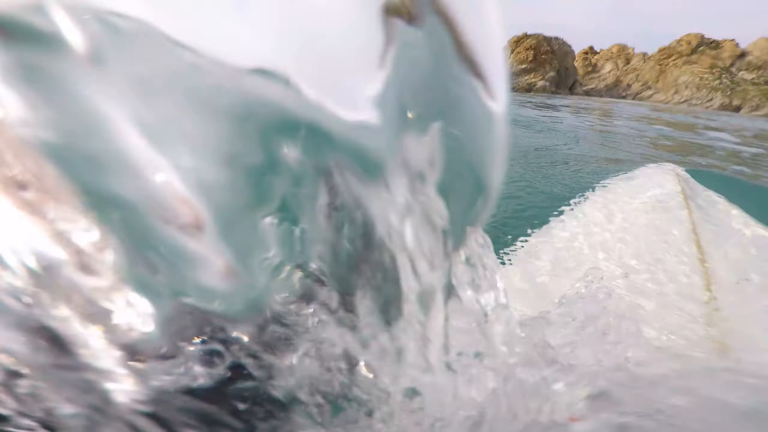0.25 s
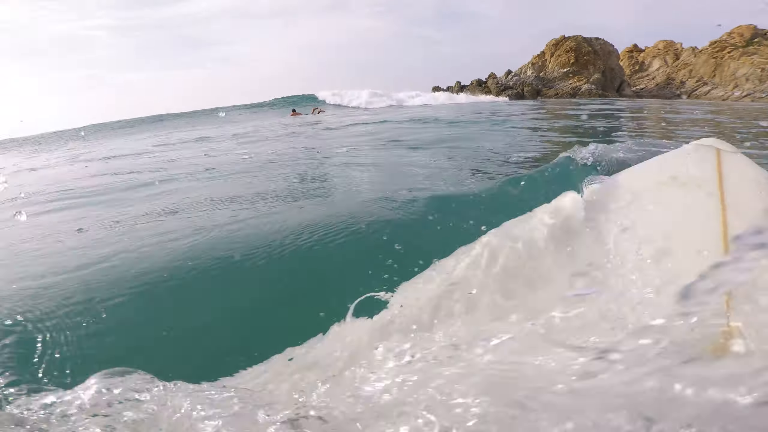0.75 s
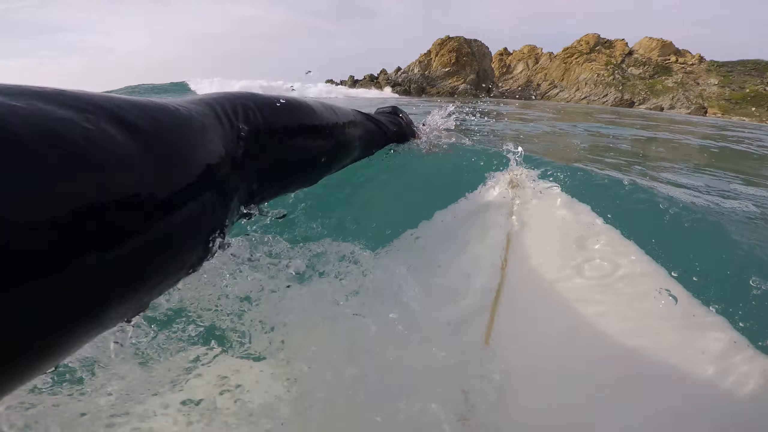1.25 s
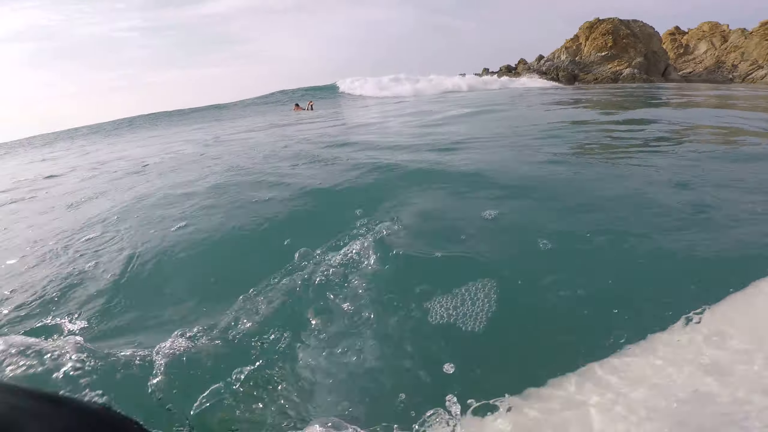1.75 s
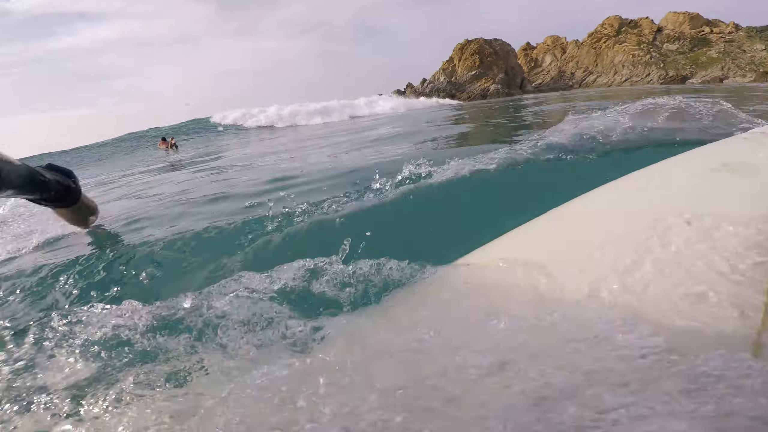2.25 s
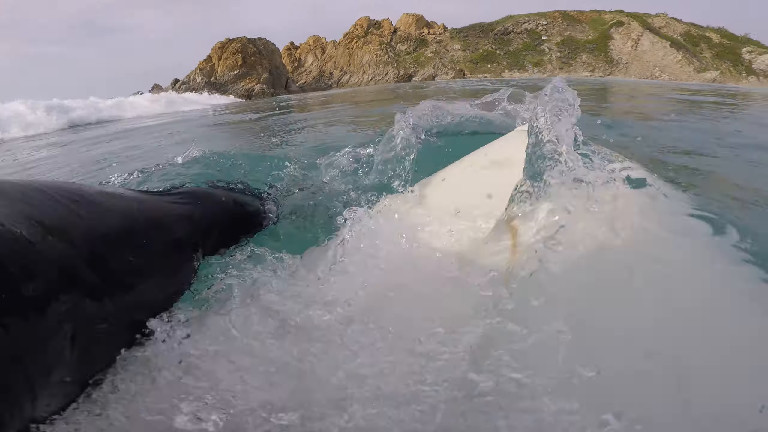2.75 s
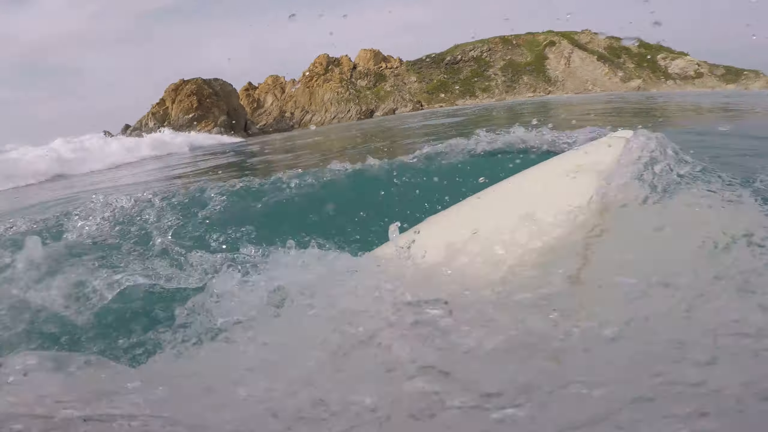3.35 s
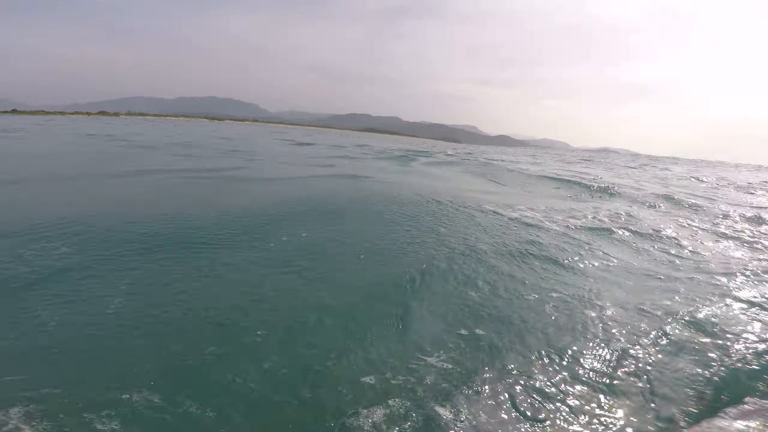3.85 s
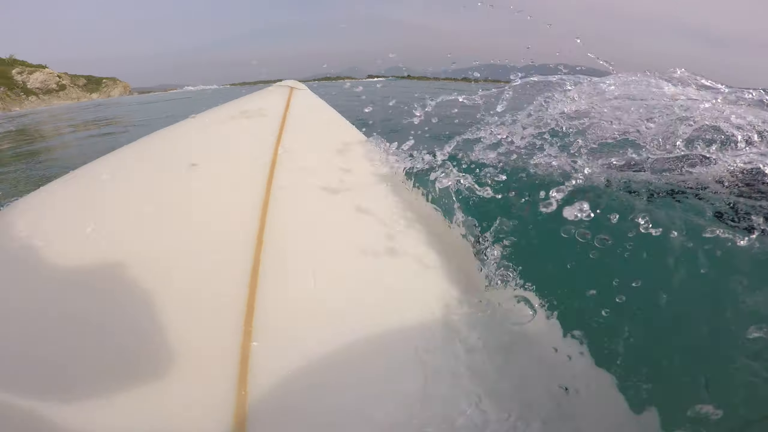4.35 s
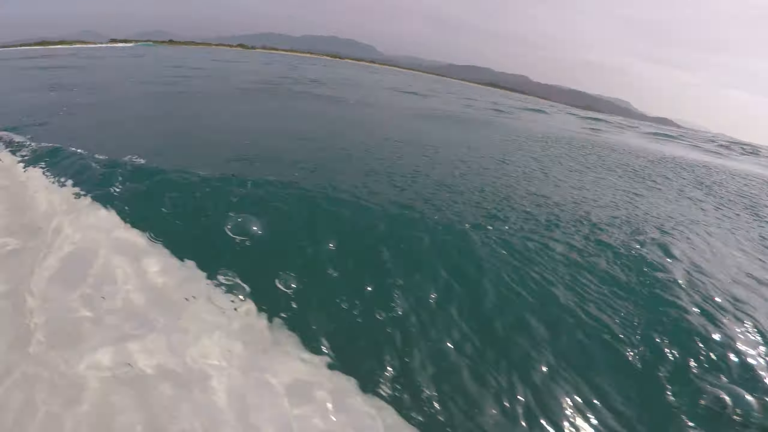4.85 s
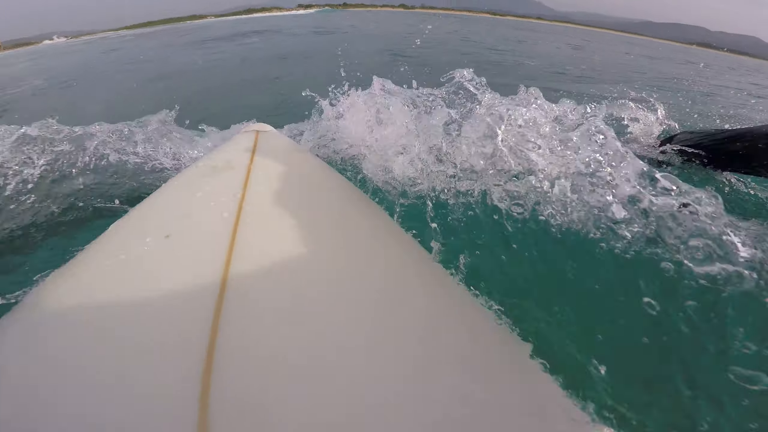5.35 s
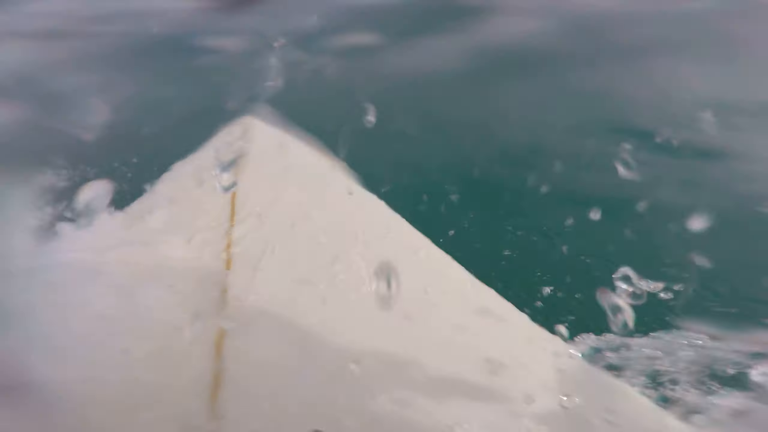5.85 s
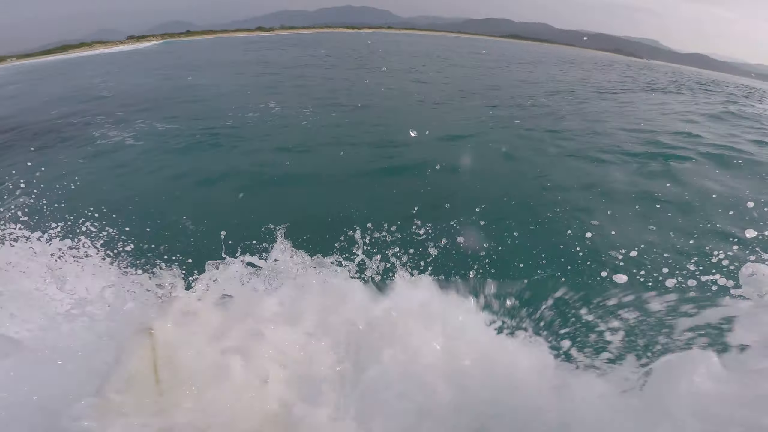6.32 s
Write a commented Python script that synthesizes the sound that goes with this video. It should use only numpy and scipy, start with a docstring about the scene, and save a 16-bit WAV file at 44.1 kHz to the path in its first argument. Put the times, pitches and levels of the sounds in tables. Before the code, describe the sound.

Water gurgles, sloshes and splashes close around a surfboard moving through small waves, with low thuds and wind rumble on the microphone.

```python
"""Foam gurgles past a surfboard running through small waves, heard from a wet waterproof housing.
Each bubble rings as a mass of water on a spring of air: the smaller the bubble, the higher its pitch.
Drops tick on the microphone port, air pockets ring, and puffs and hollows shape noise by resonance.
A water film in the port cuts the treble; spray leaks through above a notch that climbs as it drains.
Underneath, the turbulent pressure of water and wind buffets the housing."""
import sys
import numpy as np
from scipy import signal
from scipy.fft import rfft, irfft, next_fast_len
from scipy.io import wavfile
from scipy.ndimage import uniform_filter1d, minimum_filter1d

SR = 44100
rng = np.random.default_rng(int(sys.argv[2]) if len(sys.argv) > 2 else 0)


def digitize_waveform(pressure):
    """Quantize a signal to 16-bit integers and store it at the path in sys.argv[1].

    Rows of a 2-D input are taken as channels; values are limited to [-1, 1].
    """
    field = np.atleast_2d(pressure).T
    bounded = np.clip(field, -1, 1)
    quanta = np.round(bounded * 32767).astype(np.int16)
    wavfile.write(sys.argv[1], SR, quanta)


N = 290398
TIME = np.arange(N) / SR


def gain_of(db):
    """Amplitude ratio: tenfold for every 20 dB."""
    return 10 ** (np.asarray(db) / 20)


def unit_rms(x):
    """Normalisation to a mean square of 1."""
    return x / np.sqrt(np.mean(x ** 2) + 1e-20)


def spectrum_db(points, hz):
    """Spectral envelope, interpolated in log frequency and silent beyond its ends."""
    freqs, db = np.transpose(points)
    return np.interp(np.log(hz + 1), np.log(freqs + 1), db, left=-140, right=-140)


def envelopes(rows):
    """Amplitude envelopes, one for each dB column, fading in at the first row's time."""
    times, *columns = np.transpose(rows)
    fade_in = np.clip((TIME - times[0]) / .01, 0, 1) ** 2
    return [gain_of(np.interp(TIME, times, db)) * fade_in for db in columns]


def add(mix, start, sound):
    """Superposition of a sound on the mix, from start in seconds."""
    part = mix[max(round(start * SR), 0):][:len(sound)]
    part += sound[:len(part)]


def drift(seconds):
    """Low-passed noise of rms 1: a random fluctuation on the given time scale."""
    size, noise = max(round(seconds * SR / np.sqrt(2)), 2), rng.standard_normal(N)
    for _ in range(4):
        noise = uniform_filter1d(noise, size)
    return unit_rms(noise)


def patches(shape, rows, columns):
    """A random field of rms 1, correlated over so many rows and columns."""
    field = uniform_filter1d(rng.standard_normal(shape), rows, axis=0)
    return unit_rms(uniform_filter1d(field, columns, axis=1))


def ring(db, hz, t60, rise):
    """Damped oscillator: it swells for rise seconds, then loses 60 dB in t60 seconds."""
    t = np.arange(round((rise + t60) * SR) + 8) / SR
    attack = np.sin(np.pi / 2 * np.minimum(t / rise, 1)) ** 2
    decay = gain_of(-60 * np.maximum(t - rise, 0) / t60)
    return gain_of(db) * attack * decay * np.sin(2 * np.pi * hz * t)


def resonate(x, hz, width_hz):
    """Moving resonance by heterodyning: shift the curve hz to zero, low-pass, and shift back."""
    carrier = np.exp(2j * np.pi * np.cumsum(hz) / SR)
    pole = np.exp(-np.pi * width_hz * 2 / SR)
    pair = np.poly([pole, pole])
    return (carrier * signal.lfilter([1], pair, signal.lfilter([1], pair, x / carrier))).real


def bubbles(lo_hz, hi_hz, cycles, per_s, spread_db, sizes=20):
    """Bubble resonance: randomly timed damped tones that rise in pitch, a few of them strong."""
    strength = gain_of(spread_db * np.minimum(rng.exponential(1, N), 4))
    births = strength * (rng.random(N) < per_s / SR)
    size_of, out = rng.integers(0, sizes, N), np.zeros(N)
    for size, hz in enumerate(np.geomspace(lo_hz, hi_hz, sizes)):
        periods = np.arange(round(4 * cycles * SR / hz)) * hz / SR
        shape = (1 - np.exp(-periods / 0.62)) * np.exp(-periods / cycles)
        tone = shape * np.sin(2 * np.pi * periods * (1 + 0.027 * periods))
        out += signal.oaconvolve(births * (size_of == size), tone * np.sqrt(hz))[:N]
    return unit_rms(out)


def water(spectrum, bubbling, bubble_share, flutter_db, flutter_s):
    """Incoherent sum: fluttering turbulence and bubbles share the power under one spectrum."""
    size = next_fast_len(N)
    colour = gain_of(spectrum_db(spectrum, np.fft.rfftfreq(size, 1 / SR)))
    turbulence = rng.standard_normal(N) * gain_of(flutter_db * drift(flutter_s))
    hiss, tones = (unit_rms(irfft(rfft(x, size) * colour, size)[:N]) for x in (turbulence, bubbling))
    return np.sqrt(1 - bubble_share) * hiss + np.sqrt(bubble_share) * tones


RUMBLE, SLOSH, GURGLE, FROTH, RUSH, MIST = 0, 1, 2, 3, 4, 5.5  # layers, from coarse to fine
# Surges of the water. Each row: peak time in seconds, gain in dB (negative for a lull),
# place among the layers, half-length in seconds.
SURGES = [(0.519, 30.5, 0.3, 0.088), (1.211, 24.5, 0.83, 0.065), (1.58, 10, 3.05, 0.16),
          (1.8, 15, 4.3, 0.061), (2.482, 25.5, 0.086, 0.046), (2.52, 15.5, 3.54, 0.99),
          (2.621, 24, 4.8, 0.073), (2.643, 22.5, 1.03, 0.13), (2.67, -19, 3.1, 0.017),
          (2.689, -30, 0.43, 0.078), (2.94, -18, 1.64, 0.28), (3.092, 14.5, 4.55, 0.072),
          (3.284, 18.5, 3.9, 0.48), (3.335, -15.5, 2, 0.14), (3.324, -16, 4.6, 0.21),
          (3.77, 19, 3.43, 0.25), (3.972, -9.5, 1.45, 0.12), (4.17, 7.5, 2.33, 0.18),
          (4.67, 13.5, 1.38, 0.13), (4.671, 12, 3.35, 0.12), (4.74, -17, 1.17, 0.24),
          (5.35, -9, 3.8, 0.083), (5.025, 11, 3.02, 0.63), (5.25, -9.5, 6.7, 0.87), (5.41, 9.5, 3.14, 0.23),
          (5.988, 29, 2.32, 0.022), (6.53, 11, 0.53, 0.11)]


def surging(layer):
    """Amplitude modulation of one layer: each surge acts most on the bubble sizes nearest its own."""
    db = np.zeros(N)
    for peak_s, peak_db, place, half_length in SURGES:
        swell = np.bartlett(round(half_length * 2 * SR)) ** 2.41
        nearness = np.exp(-(layer - place) ** 2)
        add(db, peak_s - len(swell) / 2 / SR, peak_db * nearness * swell)
    return gain_of(db)


# Buffeting before surges. Each row: time in seconds, rumble level in dB, slosh level in dB.
BUFFET_LEVELS = [(.125, -23, -50), (.21, -10, -10.5), (.29, -6.5, -12.5), (.32, -44, -21), (.41, -39, -44),
                 (.59, -33.5, -49.5), (1.14, -21.5, -39), (1.86, -13, -22.5), (2.44, -16, -30),
                 (3.05, -9.5, -16.5), (4.3, -13, -24), (5.23, -9.5, -25.5), (5.93, -14, -16.5),
                 (6.06, -11, -28), (6.3, -18.5, -17.5), (6.58, -11.5, -26.5)]
# Spectra of the two layers. Each row: frequency in Hz, relative density in dB.
RUMBLE_SPECTRUM = [(3, -11.5), (11, 1.5), (19, -1.5), (27, -3), (42, -5), (62, -14), (90, -33),
                   (200, -53.5)]
SLOSH_SPECTRUM = [(35, -21.5), (65, 0.5), (120, 3.5), (200, -2), (300, -14.5), (600, -55)]


def buffeting():
    """Turbulent pressure on the housing: a deep rumble, and a slosh with large bubbles in it."""
    rumble_gain, slosh_gain = envelopes(BUFFET_LEVELS)
    rumble = water(RUMBLE_SPECTRUM, np.zeros(N), bubble_share=0, flutter_db=1, flutter_s=0.076)
    large = bubbles(68.5, 220, cycles=0.93, per_s=60, spread_db=6.6)
    slosh = water(SLOSH_SPECTRUM, large, bubble_share=0.41, flutter_db=2.8, flutter_s=0.031)
    return rumble_gain * surging(RUMBLE) * rumble + slosh_gain * surging(SLOSH) * slosh


WET_HZ, DRAINED_HZ, FILM_WAVER_HZ = 4380, 6350, 110
# Dousings that thicken the film. Each row: time in seconds, climb of the edge in Hz per second.
DOUSINGS = [(.2, 3260), (6.0, 894)]


def film_edge(t):
    """Transmission through a water film: the notch's upper edge, in Hz, climbs as the film drains."""
    edge = np.full(len(t), float(WET_HZ))
    for start, climb in DOUSINGS:
        edge = np.where(t >= start, np.minimum(WET_HZ + climb * (t - start), DRAINED_HZ), edge)
    return edge + FILM_WAVER_HZ * np.interp(t, TIME, drift(.06))


MIST_DB, MIST_NOTCH_DB = -74, 7.5
WET_NOTCH_DB, RUN_OFF_S = 2, 1.7  # the notch is deeper until the first film has run off
# Spectrum of spray and mist. Each row: frequency in Hz, relative density in dB.
SPRAY_SPECTRUM = [(3000, -5.5), (7000, -12.5), (10000, -16), (11500, -22), (13000, -40), (15500, -62)]
# Bursts of fine spray. Each row: start in seconds, peak level in dB, length in seconds.
SPRAY_BURSTS = [(0.139, -65.5, 1), (1.18, -64, 0.18), (0.831, -68, 0.13), (1.299, -65.5, 0.47),
                (2.48, -66, 0.17), (6.093, -72.5, .4)]


def spray():
    """Filtering by the film: patchy spray and a faint mist leak through above its notch."""
    level = np.zeros(N)
    for start, db, length in SPRAY_BURSTS:
        progress = np.linspace(0, 1, round(length * SR))
        add(level, start, gain_of(db) * np.sin(np.pi * progress ** 0.4) ** 2)  # peaks early
    crackle = rng.standard_normal(N) * gain_of(4.2 * drift(.003) + 2.2 * drift(.015))
    hz, t, frames = signal.stft(crackle, SR, nperseg=256)
    above_hz = hz[:, None] - film_edge(t)
    colour_db = spectrum_db(SPRAY_SPECTRUM, hz)[:, None]
    burst_gain = gain_of(colour_db - np.clip(-above_hz / 8.2, 0, 35) - np.clip(above_hz / 250, 0, 12))
    burst_gain *= np.interp(t, TIME, level) / np.sqrt((burst_gain ** 2).mean(0))
    notch_db = MIST_NOTCH_DB + WET_NOTCH_DB * (t < RUN_OFF_S)
    mist_gain = gain_of(colour_db - np.clip(-above_hz / 47, 0, notch_db))
    mist_gain *= gain_of(MIST_DB) * (t > SPRAY_BURSTS[0][0]) / np.sqrt((mist_gain ** 2).mean(0))
    bursts = frames * burst_gain * gain_of(2.5 * patches(frames.shape, 8, 3)) / crackle.std()
    mist = signal.stft(rng.standard_normal(N) * surging(MIST), SR, nperseg=256)[2] * mist_gain
    return signal.istft(bursts + mist, SR, nperseg=256)[1][:N]


# Hollows that whistle as the port drains, and two air pockets that chirp upward near 5.0 s and 5.4 s. Each row:
# start and end in seconds, first and last frequency in Hz, first and last level in dB.
HOLLOWS = [(0.332, 0.67, 2950, 2830, -58.5, -65), (0.425, 0.89, 1200, 2040, -62, -64),
           (1.5, 1.708, 1090, 765, -41, -36), (1.19, 1.293, 3100, 2860, -44, -54),
           (1.27, 1.494, 2880, 2620, -55, -57), (1.33, 1.565, 6200, 6950, -69, -70),
           (1.413, 1.485, 1340, 1660, -34, -42), (1.488, 1.75, 1520, 2300, -40.5, -51),
           (1.556, 1.597, 1780, 1930, -34, -50), (2.766, 2.962, 504, 540, -25.5, -29),
           (5.003, 5.038, 830, 1400, -31, -17), (5.387, 5.412, 870, 1530, -23, -20.5),
           (6.015, 6.296, 1010, 815, -37, -46.5), (6.005, 6.167, 1800, 1900, -49, -48)]


def hollows():
    """Cavity resonance: fluttering noise takes a pitch that glides as the air space changes."""
    out, flutter = np.zeros(N), rng.standard_normal(N) * gain_of(3.2 * drift(.008))
    for start, end, from_hz, to_hz, from_db, to_db in HOLLOWS:
        size = round((end - start) * SR)
        glide = np.linspace(from_hz, to_hz, size)
        whistle = unit_rms(resonate(flutter[round(start * SR):][:size], glide, width_hz=180))
        shape = gain_of(np.linspace(from_db, to_db, size)) * signal.windows.tukey(size, .3)
        add(out, start, shape * whistle)
    return out


PUFF_WIDTH_RATIO, PUFF_WIDEST_HZ = 0.33, 2400
PORT_HZ, PORT_WIDTH_HZ = 3170, 930
# Puffs and sloshes through the port. Each row: middle in seconds, peak level in dB,
# centre frequency in Hz, length in seconds.
PUFFS = [(0.201, -36, 5500, 0.047), (0.24, -22, 175, 0.066), (0.246, -36, 3770, 0.086),
         (1.558, -35, 1110, 0.061), (1.8, -37.5, 1740, 0.076), (2.124, -42.5, 2400, 0.048),
         (2.532, -58, 6700, 0.035), (2.584, -67, 10500, 0.095), (3.107, -32, 1360, 0.13),
         (3.406, -41, 2150, 0.094), (3.748, -23, 1010, 0.034), (4.08, -22, 866, 0.061),
         (4.169, -19, 710, 0.052), (4.575, -36, 1360, 0.041), (4.738, -33.5, 1200, 0.061),
         (4.877, -24, 1050, 0.068), (5.029, -23.5, 1420, 0.044), (5.106, -24.5, 855, 0.068),
         (5.267, -24, 980, 0.063), (5.422, -33.5, 1380, 0.11), (5.455, -37, 2450, 0.036),
         (5.525, -22.5, 1390, 0.05), (5.773, -15.5, 403, .07), (5.873, -57, 6600, 0.052),
         (6.218, -19.5, 195.6, 0.13), (6.343, -43.5, 2900, 0.035), (6.346, -57, 7600, 0.037)]
# Air hissing at the port's resonance. Each row: middle in seconds, peak level in dB, length in seconds.
PORT_HISSES = [(1.204, -42, 0.018), (5.043, -36.5, 0.058), (5.423, -41.5, 0.053), (6.233, -56.5, 0.13)]


def puffs():
    """Resonance driven by flow noise: short sputtering bursts, each in one band."""
    out, sputter = np.zeros(N), gain_of(2.8 * drift(0.0057))
    rushes = [(middle, db, hz, min(PUFF_WIDTH_RATIO * hz, PUFF_WIDEST_HZ), length)
              for middle, db, hz, length in PUFFS]
    hisses = [(middle, db, PORT_HZ, PORT_WIDTH_HZ, length) for middle, db, length in PORT_HISSES]
    for middle, db, hz, width_hz, length in rushes + hisses:
        size = round(length * SR)
        band = resonate(rng.standard_normal(6000), np.full(6000, hz), width_hz)[-size:]
        add(out, middle - length / 2, gain_of(db) * unit_rms(band) * np.hanning(size))
    return out * sputter


# Slaps of water on the housing. Each row: start in seconds, peak level in dB, pitch in Hz.
SLAPS = [(0.202, -1, 96), (0.282, -14, 76), (1.202, -9, 72), (1.394, -10, 70.4), (1.647, -5, 90.7),
         (1.776, -5.5, 113.4), (2.475, -16, 99.6), (2.617, -11.5, 78.6), (2.726, -3, 108), (3.566, -5, 110),
         (4.67, -7.5, 69.6), (4.813, -16, 74.4), (4.953, -7, 72.2), (5.95, -7.5, 73), (6.167, -17, 106),
         (6.503, -6, 89)]


def slaps():
    """Impulse response: each slap pushes the housing into a low, damped thud."""
    out = np.zeros(N)
    for start, db, hz in SLAPS:
        add(out, start, ring(db, hz, t60=11 / hz, rise=0.41 / hz))
    return out


# Air pockets. Each row: start in seconds, peak level in dB, pitch in Hz, length in seconds.
AIR_POCKETS = [(0.265, -1.5, 436, 0.0083), (0.289, -6.5, 690, 0.0095), (0.353, -18, 387, 0.0069),
               (0.879, -28, 448, 0.012), (0.943, -39, 1126, 0.027), (0.981, -36, 510, 0.026),
               (1.19, -11, 333, 0.016), (1.318, -21, 1100, 0.045), (1.399, -26, 1103, 0.037),
               (1.427, -29, 1500, 0.014), (1.457, -27, 1546, 0.017), (1.673, -8, 520, 0.0038),
               (1.76, -12.5, 603, 0.011), (1.944, -19.5, 526, 0.013), (2.216, -18.5, 650, 0.03),
               (2.63, -14.5, 650, 0.032), (2.656, 9, 490, 0.0088), (2.749, -7, 553, 0.047),
               (2.825, -15, 508, 0.028), (3.229, -11, 305, 0.024), (3.26, -19, 1200, 0.045),
               (3.271, -8.5, 710, 0.015), (3.281, -3.5, 926, 0.014), (3.447, -10, 363, 0.024),
               (3.637, -18, 550, 0.015), (3.713, -16.5, 378, 0.039), (4.136, -15.5, 344, 0.014),
               (4.565, -16.5, 743, 0.016), (4.657, -5.5, 333, 0.014), (4.729, -16.5, 972, 0.026),
               (4.77, -20.5, 710, 0.04), (4.822, -6.5, 627, 0.0046), (4.92, -13, 505, 0.012),
               (5.262, -15.5, 340, 0.0077), (5.304, -16, 470, 0.039), (5.448, -17, 1105, 0.023),
               (5.539, -21, 970, 0.032), (5.464, -10.5, 962, 0.015), (5.831, -1.5, 613, 0.0084),
               (5.897, -15, 1285, 0.044), (5.952, -20, 1840, .01), (5.964, -4, 1347, 0.0077),
               (5.977, -6, 476, 0.015)]


def air_pockets():
    """Volume oscillation: trapped air rings at a wobbling, rising pitch until its pocket closes."""
    out, wobble, tremble = np.zeros(N), drift(0.0038), drift(0.0018)
    for start, db, hz, length in AIR_POCKETS:
        progress = np.linspace(0, 1, round(max(length, .004) * SR))
        span = round(start * SR) + np.arange(len(progress))
        pitch = hz * (1 + 0.082 * (progress - .5) + 0.085 * wobble[span])
        shape = np.sin(np.pi * progress ** 0.67) ** 2.66 * gain_of(db + 2.4 * tremble[span])
        add(out, start, shape * np.sin(2 * np.pi * np.cumsum(pitch) / SR))
    return out


KNOCK_HZ, PITCH_SCATTER, SPLIT_S = 1200, 0.17, .0008
# Drops on the port, before scatter. Each row: time in seconds, click level in dB, click pitch in Hz,
# ping level in dB, ping pitch in Hz, knock level in dB.
DROPS = [(0.1656, -47, 8000, -48, 2770, -8), (0.175, -29, 7960, -24, 3000, -12),
         (0.185, -21, 7800, -17, 3260, -17), (0.189, -39, 9500, -32, 5860, -14),
         (0.1956, -13.5, 7500, -15, 3270, -1.5), (0.204, -37, 9500, -36, 5800, -26),
         (0.206, -36, 8000, -7, 3720, -27), (0.218, -27, 6000, -21, 3700, -21),
         (0.227, -39, 5000, -35, 2300, -15), (0.231, -38.5, 6740, -24.5, 3280, -34),
         (0.2425, -28, 5450, -19, 3700, -36), (.258, -32, 6000, -22.5, 3000, -16),
         (0.262, -27, 5000, -22, 2760, -3.5), (0.292, -32.5, 6760, -17.5, 2120, -9),
         (0.3084, -40, 6900, -23.5, 2760, -31), (0.318, -50, 6000, -34, 3080, -33),
         (0.3807, -47, 6000, -53, 3500, -37), (0.503, -48, 4400, -35, 3620, -37),
         (0.632, -44, 6400, -58, 3280, -49), (1.193, -34.5, 6800, -20.5, 3140, -11),
         (1.338, -26, 4900, -32, 3700, -26), (1.511, -47, 4500, -35, 2990, -33),
         (1.662, -47.5, 4500, -34, 3060, -31), (1.7842, -37.5, 8300, -16, 2750, -20),
         (2.348, -43.5, 7000, -40, 3180, -44), (2.519, -45, 6500, -22, 2800, -27),
         (2.5323, -49, 6500, -16, 2780, -12), (2.5487, -29.5, 7600, -17.5, 2820, -23),
         (2.615, -34, 7740, -31, 2870, -33), (2.69, -64, 4000, -21, 2500, -40),
         (3.241, -42, 7600, -12, 2400, -8), (3.2947, -38, 6500, -15.5, 2790, 0),
         (3.468, -63, 4070, -22, 2180, -37), (3.618, -62, 4000, -29, 2440, -18),
         (3.958, -69, 4030, -31, 2330, -47), (4.665, -43.5, 6050, -19.5, 2570, -9),
         (4.673, -42, 4070, -15.5, 2280, -28), (5.583, -62, 4000, -25, 2590, -33),
         (5.664, -64, 3800, -30, 2300, -30), (5.8088, -33.5, 8800, -16.5, 2400, -16),
         (5.857, -45, 4800, -27, 2480, -33), (5.8707, -28, 6640, -18, 2500, -13),
         (5.934, -48, 7550, -46, 7400, -13), (5.966, -25, 7800, -17.5, 2960, 1),
         (6.509, -44, 7500, -24.5, 2850, -17.5)]


def drops():
    """Impact excitation: three fragments of each drop click and ping the port; the housing knocks."""
    out, chances = np.zeros(N), rng.uniform(-1, 1, (len(DROPS), 3, 4))
    for (start, click_db, click_hz, ping_db, ping_hz, knock_db), chance in zip(DROPS, chances):
        for fragment, (late, bright, high, strong) in zip((-1, 0, 1), chance):
            at = start + SPLIT_S * late / 2
            click_pitch = click_hz * (1 + PITCH_SCATTER * (fragment + 0.34 * bright))
            ping_pitch = ping_hz * (1 + 0.57 * PITCH_SCATTER * fragment * (1 + 0.45 * high))
            add(out, at, ring(click_db - 3 * fragment + 1.5 * strong, click_pitch, .0012, rise=.00019))
            add(out, at, ring(ping_db - 11 * abs(fragment) - 1.3 * strong, ping_pitch, .006, rise=.0012))
        knock_pitch = KNOCK_HZ * (1 + PITCH_SCATTER * chance[0, 0])
        add(out, start, ring(knock_db, knock_pitch, t60=.0058, rise=.00049))
    return out


# Bands where the film damps the foam. Each row: start and end in seconds, first and last centre
# in Hz, half-width in Hz, depth in dB (negative for a lift).
DAMPED_BANDS = [(0.378, .88, 1950, 2300, 330, 0), (5.12, 5.38, 1600, 1470, 350, 0.5),
                (1.44, 1.76, 1200, 1750, 220, 5), (1.807, 2.12, 1080, 946, 300, 6.5),
                (2.908, 3.06, 1600, 1700, 450, 4.5), (3.298, 3.37, 1500, 1700, 550, 10),
                (5.985, 6.18, 1380, 1330, 180, 10), (6.258, 6.5, 1600, 1400, 600, -1.5)]


def film_damping(sound):
    """Selective absorption: the film dulls gliding bands and ripples the spectrum by about 1 dB."""
    hz, t, frames = signal.stft(sound, SR, nperseg=512, noverlap=384)
    db = patches(frames.shape[::-1], 24, 6).T
    for start, end, from_hz, to_hz, width_hz, depth_db in DAMPED_BANDS:
        fade = np.clip(np.minimum(t - start, end - t) / .012, 0, 1)
        centre_hz = np.interp(t, (start, end), (from_hz, to_hz))
        db -= depth_db * fade * np.exp(-((hz[:, None] - centre_hz) / width_hz) ** 2)
    return signal.istft(frames * gain_of(db), SR, nperseg=512, noverlap=384)[1][:N]


RUSH_DB, RUSH_FOLLOW = -11.5, 0.95  # the rush lies below the froth and follows it a little loosely
# Foam passing the port, before surges. Each row: time in seconds, gurgle level in dB,
# froth level in dB relative to the gurgle.
FOAM_LEVELS = [(0.125, -61.5, 14), (0.173, -18.5, 0), (.27, -22, -16), (.45, -57.5, -2), (1.17, -41, 2),
               (1.44, -35, -6), (1.9, -22.5, -18), (2.531, -26.5, -14.5), (2.97, -22.5, -16),
               (3.6, -25, -15), (4.37, -23.5, -13), (5.001, -28, -12.5), (5.721, -22, -8),
               (5.969, -21.5, -4.5), (5.996, -34, -8), (6.15, -27.5, -13.5), (6.42, -35, -18),
               (6.58, -34, -5)]
# Spectra of the three layers. Each row: frequency in Hz, relative density in dB.
GURGLE_SPECTRUM = [(110, -33), (210, 7.5), (400, 5.5), (600, 2), (850, -4.5), (1100, -52), (2000, -62.5)]
FROTH_SPECTRUM = [(450, -20), (780, 10.5), (1050, 4), (1400, -2.5), (1800, -5), (2300, -39), (3500, -60.5)]
RUSH_SPECTRUM = [(1100, -28.5), (1600, -8.5), (2050, -6.5), (2600, -6.5), (3050, -17), (3500, -26.5),
                 (3900, -39), (4800, -44), (9000, -44.5), (11500, -74.5), (13500, -86.5)]


def foam():
    """Bubble resonance falls with size: big bubbles gurgle, small ones froth, the finest rush."""
    gurgle_gain, froth_gain = envelopes([(s, db, db + froth_db) for s, db, froth_db in FOAM_LEVELS])
    rush_gain = gain_of(RUSH_DB) * froth_gain ** RUSH_FOLLOW * gurgle_gain ** (1 - RUSH_FOLLOW)
    swell = drift(0.027)  # moves all three layers together
    big = bubbles(217.6, 920, cycles=2.6, per_s=300, spread_db=2)
    gurgle = water(GURGLE_SPECTRUM, big, bubble_share=0.69, flutter_db=0.91, flutter_s=0.0075)
    small = bubbles(738, 1900, cycles=2.2, per_s=370, spread_db=2.3)
    froth = water(FROTH_SPECTRUM, small, bubble_share=0.26, flutter_db=3.2, flutter_s=0.018)
    finest = bubbles(1800, 3400, cycles=2.8, per_s=1000, spread_db=1.4)
    rush = water(RUSH_SPECTRUM, finest, bubble_share=0.41, flutter_db=5.5, flutter_s=0.017)
    return (gurgle_gain * surging(GURGLE) * gain_of(0.55 * swell) * gurgle
            + froth_gain * surging(FROTH) * gain_of(0.41 * swell) * froth
            + rush_gain * surging(RUSH) * gain_of(1.6 * swell) * rush)


def scene():
    """Superposition: the pressures of all sources add at one microphone."""
    flow = buffeting() + film_damping(foam())
    return (flow + hollows() + spray() + drops() + air_pockets() + slaps() + puffs())[None]


def record(dry):
    """Peak limiting and band limiting: the gain ducks around each peak, then a low-pass follows."""
    ceiling, cutoff_hz = .93, 15750
    gain = minimum_filter1d(ceiling / np.maximum(abs(dry), ceiling), size=451)
    for _ in range(3):
        gain = uniform_filter1d(gain, size=150)
    low_pass = signal.firwin(511, cutoff_hz, window=("kaiser", 9), fs=SR)
    return signal.oaconvolve(dry * gain, low_pass[None], "same")


dry = scene()
out = record(dry)
digitize_waveform(out)
```